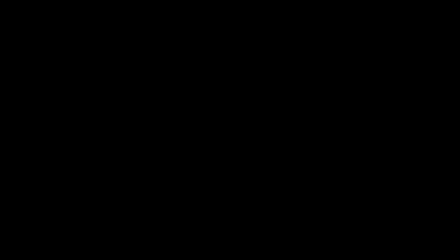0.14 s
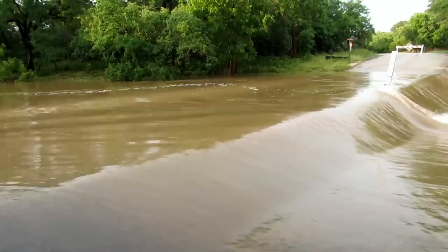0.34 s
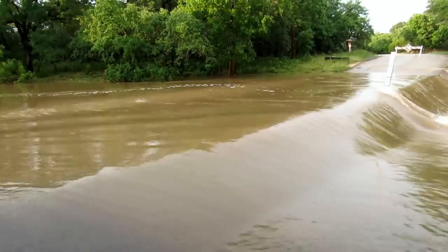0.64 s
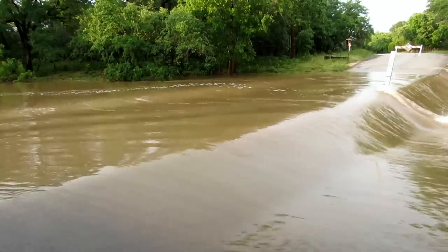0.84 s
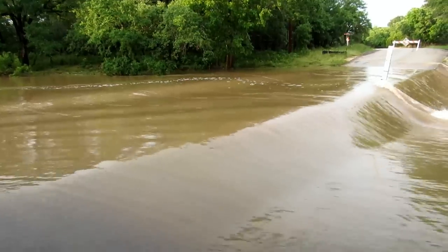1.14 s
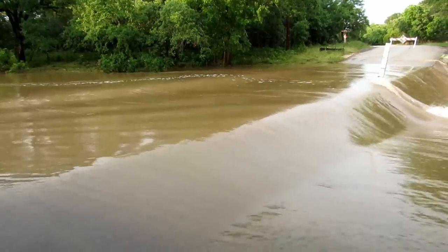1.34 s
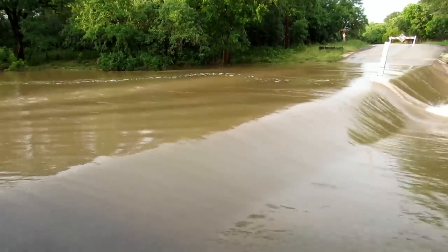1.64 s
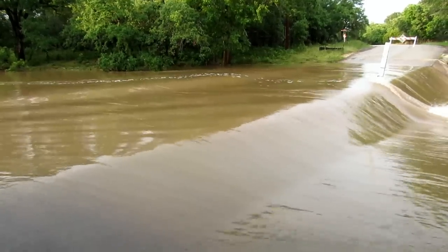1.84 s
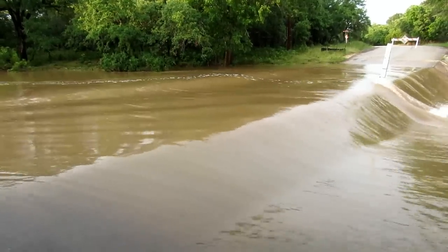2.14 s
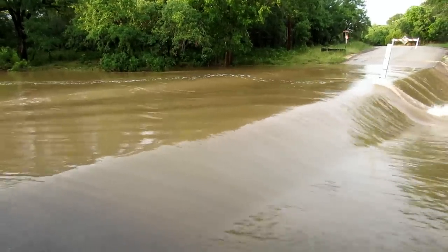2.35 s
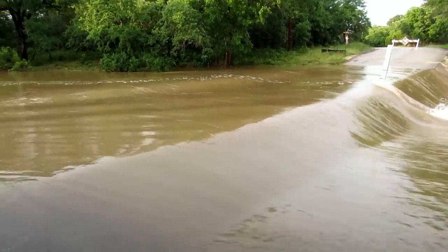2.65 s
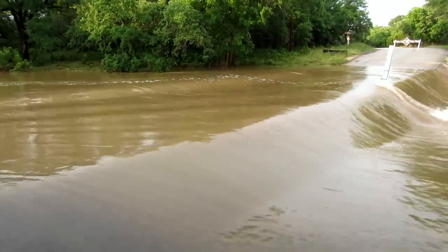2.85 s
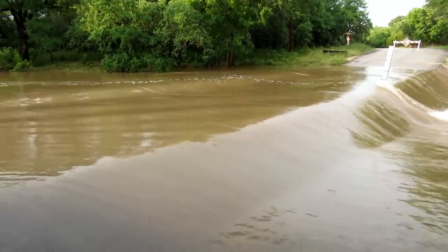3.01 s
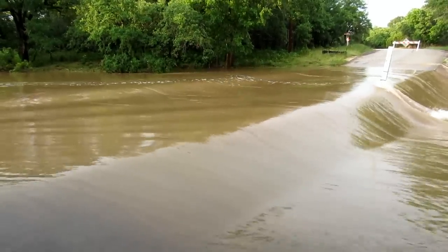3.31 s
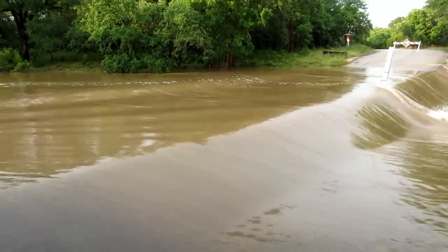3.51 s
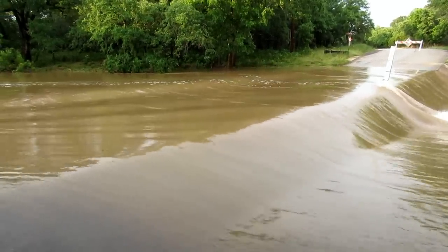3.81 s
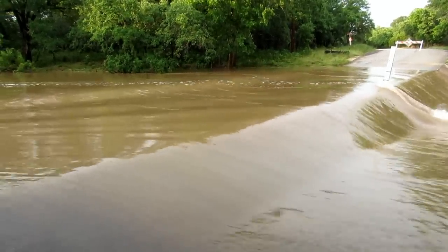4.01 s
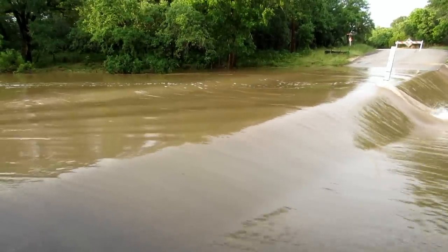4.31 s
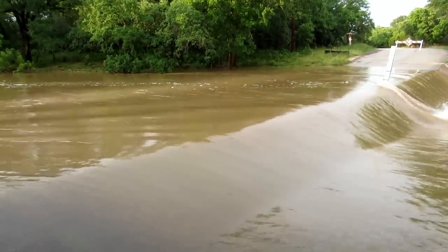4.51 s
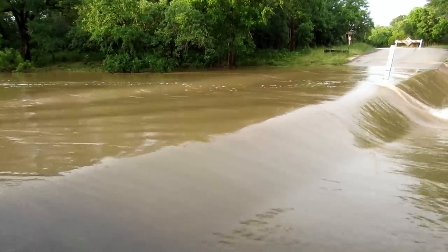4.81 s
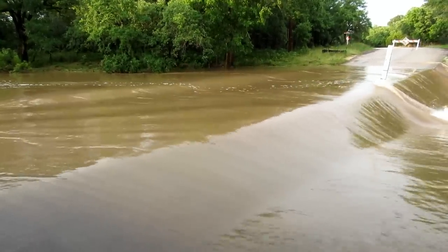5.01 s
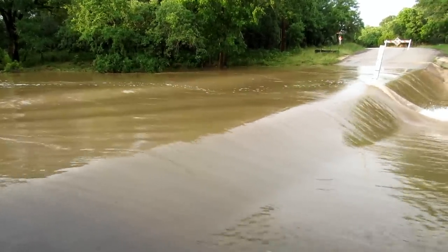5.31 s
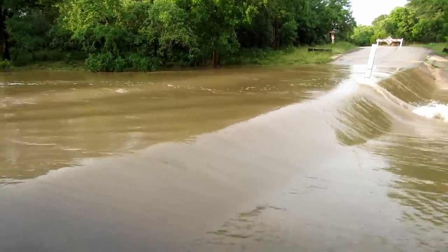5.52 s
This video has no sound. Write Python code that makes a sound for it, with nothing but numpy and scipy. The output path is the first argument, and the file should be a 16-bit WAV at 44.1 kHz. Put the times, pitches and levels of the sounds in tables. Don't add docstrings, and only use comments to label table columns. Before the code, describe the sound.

After a brief silence, a loud rush of water starts abruptly, roaring and hissing continuously with dull, airy plunges inside it.

```python
import sys
import numpy as np
from scipy import signal
from scipy.io import wavfile
from scipy.ndimage import uniform_filter1d

SR = 44100
rng = np.random.default_rng(int(sys.argv[2]) if len(sys.argv) > 2 else 0)


def store_wav(level_fs):
    pcm = np.round(np.clip(np.atleast_2d(level_fs), -1, 1) * 32767)
    wavfile.write(sys.argv[1], SR, pcm.T.astype(np.int16))


def natural_amplitude(level_db):
    exponent = np.asarray(level_db, float) / 20
    return 10 ** exponent


N = 249590


def evened(x):
    return x / np.sqrt(np.mean(x ** 2) + 1e-20)


def read(points, hz, column=1):
    columns = np.transpose(points)
    return np.interp(np.log(hz + 1), np.log(columns[0] + 1), columns[column])


def smooth(x, span, axis):
    size = max(round(span), 1)
    return uniform_filter1d(uniform_filter1d(x, size, axis), size, axis)


# start_s, level_db (thump peak), duck_db (gain lost)
PLUNGES = [
    (0.686, -7, 0.5),
    (.863, -6, 1.3),
    (1.942, -6, 1),
    (2.465, -6, 0.7),
    (2.885, -14, 2.2),
    (3.871, -15, 1.8),
    (4.079, -4, 1),
    (4.569, -4.5, 1.4),
    (5.475, -5, 1.5),
]


def plunges(cycles, left_db):
    thump_hz = 317
    t, thumps = np.arange(N) / SR, np.zeros(N)
    for start_s, level_db, _ in PLUNGES:
        turns = (t - start_s) * thump_hz
        envelope = np.exp(-(turns / cycles) ** 2)
        thumps += natural_amplitude(level_db) * envelope * np.cos(2 * np.pi * turns)
    return thumps * natural_amplitude([[left_db], [-left_db]])


def bubbles(per_s, spread_db, cycles):
    pitches_hz = np.geomspace(120, 15000, num=36)
    swarms = np.zeros((2, N))
    for hz in pitches_hz:
        t = np.arange(int(3 * cycles * SR / hz) + 4) / SR * hz / cycles
        chirp = np.sqrt(t) * np.exp(-2.5 * t) * np.sin(2 * np.pi * cycles * (t + 0.052 * t ** 2))
        chirp /= np.linalg.norm(chirp)
        births = rng.random((2, N)) < per_s * hz / pitches_hz.sum() / SR
        strengths = births * natural_amplitude(spread_db * np.minimum(rng.exponential(1, (2, N)), 4))
        swarms += signal.oaconvolve(strengths, chirp[None], axes=1)[:, :N]
    return evened(swarms)


# pitch_hz, level_db (per Hz)
POUR = [(25, -26), (50, -14.5), (129, -3), (300, -.5), (435, -4), (600, -14.5), (830, -12.5), (1080, -11.5),
        (1540, -20.5), (1960, -20), (3270, -25.5), (9350, -32), (13000, -41.5), (15700, -48)]
# pitch_hz, width_hz, depth_db
DIPS = [(485, 84, -1.5), (691, 102, -14.5), (1500, 320, -1), (2440, 530, -2.5), (3270, 550, -3.5),
        (3940, 450, -2.5), (4670, 240, -3), (5570, 180, -3.5), (6650, 340, -1), (7450, 450, -1.7)]
# pitch_hz, likeness_0_to_1 (left to right), lean_db (left minus right), lead_rad (left leads)
PORTS = [(60, .99, 1.7, .05), (250, .997, 2.0, -.15), (430, .99, 2.6, -.4), (560, .955, .1, -.78),
         (690, .925, -2.5, -.42), (900, .97, -2.7, -.34), (1350, .945, -3.7, -.38),
         (1600, .905, -3.7, -.14), (2000, .97, -2.6, -.07), (2800, .95, -2.0, -.06),
         (3900, .925, -1.2, -.15), (7000, .77, -.4, -.72), (11000, .53, .2, -1.25), (15500, .36, .4, -2.6)]


def at_ports(drive):
    hz, _, (a, b) = signal.stft(drive, SR, nperseg=2048, noverlap=1536)
    colour_db = read(POUR, hz)
    for pitch_hz, width_hz, depth_db in DIPS:
        colour_db = colour_db + depth_db / (1 + ((hz - pitch_hz) / width_hz * 2) ** 2)
    same, lean_db, lead = (read(PORTS, hz, column=k)[:, None] for k in (1, 2, 3))
    port = natural_amplitude(lean_db / 2) * np.exp(.5j * lead)
    left = a * port
    right = (same * a + np.sqrt(1 - same ** 2) * b) / port
    centre = np.sqrt(abs(port) ** 2 + abs(port) ** -2 + 2 * same * np.cos(lead)) / 2
    z = np.array([left, right]) * natural_amplitude(colour_db)[:, None] / centre
    pair = signal.istft(z, SR, nperseg=2048, noverlap=1536)[1][:, :N]
    band = (hz > 1500) & (hz < 12000)
    power = abs(z.mean(0)) ** 2
    return pair / (np.std(pair.mean(0)) * np.sqrt(np.sum(power[band]) / np.sum(power)))


# start_s, level_db
FLOW = [(0.5, 1.5), (0.72, -0.5), (1.05, -0.5), (1.45, 0.4), (1.9, -0.5), (2.4, 0), (2.85, -0.15),
        (3.1, -0.8), (3.8, 0.6), (4.3, 0), (4.7, -0.6), (5.2, 0.9), (5.6, -1)]


def water(bubble_share, patchy_db, flicker_db, surge_db):
    split_hz = 480
    fizz_db, roar_db = -26.5, -0.47
    roar_follows = 0.34
    roar_swell_db = .6
    splash_per_duck, splash_s = 0.4, 0.017

    share = np.clip(bubble_share, 0, 1)
    swarm = bubbles(per_s=30000, spread_db=2.0, cycles=4.65)
    churn = rng.standard_normal((2, N))
    pair = at_ports(np.sqrt(share) * swarm + np.sqrt(1 - share) * churn)

    hz, t, z = signal.stft(pair, SR, nperseg=512, noverlap=384)
    roar = 1 / (1 + (hz / split_hz) ** 4)[:, None]
    fizz = 1 - roar
    flow_db = np.interp(t, *np.transpose(FLOW))
    field_db = fizz_db + roar_db * roar + flow_db * (fizz + roar_follows * roar)
    for start_s, _, duck_db in PLUNGES:
        field_db += fizz * splash_per_duck * duck_db * np.exp(-((t - start_s) / splash_s + .5) ** 2)

    chance = rng.standard_normal((len(t), len(hz), 2)).T
    patches = smooth(smooth(chance[0], 8.0, axis=0), 12.0, axis=1)
    field_db += patchy_db * fizz * evened(patches)
    flicker = smooth(smooth(chance[1], 48.0, axis=0), 5.0, axis=1)
    field_db += flicker_db * fizz * evened(flicker)
    surge = smooth(rng.standard_normal(len(t)), 25.0, axis=0)
    field_db += surge_db * evened(surge)
    swell = smooth(rng.standard_normal(len(t)), 45.0, axis=0)
    field_db += roar_swell_db * roar * evened(swell)
    return signal.istft(z * natural_amplitude(field_db), SR, nperseg=512, noverlap=384)[1][:, :N]


def scene():
    thumps = plunges(cycles=0.62, left_db=1.5)
    pour = water(bubble_share=0.27, patchy_db=-0.14, flicker_db=0.5, surge_db=0.0)
    return pour + thumps


def roll_off(x):
    return signal.sosfilt(signal.butter(12, 15730, fs=SR, output="sos"), x)


def record(dry):
    duck_s, recover_s = .003, 0.28
    low_cut_hz, mic_top_hz = 33, 15950
    open_s, fade_s = .4702, .0022
    t = np.arange(N) / SR
    gain_db = np.zeros(N)
    for start_s, _, duck_db in PLUNGES:
        onset = np.clip((t - start_s) / duck_s, 0, 1)
        gain_db -= duck_db * onset * np.exp(-abs(t - start_s) / recover_s)
    low_cut = signal.butter(3, low_cut_hz, "high", fs=SR, output="sos")
    x = signal.sosfilt(low_cut, dry * natural_amplitude(gain_db))
    x = x / (1 + abs(x / .9) ** 6) ** (1 / 6)
    x = x * np.clip((t - open_s) / fade_s, 0, 1) ** 2
    mix = signal.oaconvolve(x, signal.firwin(255, mic_top_hz, fs=SR)[None], "same")
    return roll_off(mix)


dry = scene()
out = record(dry)
store_wav(out)
```